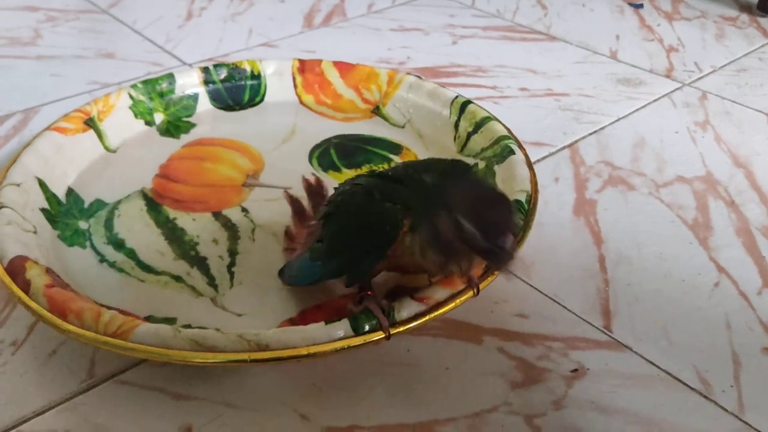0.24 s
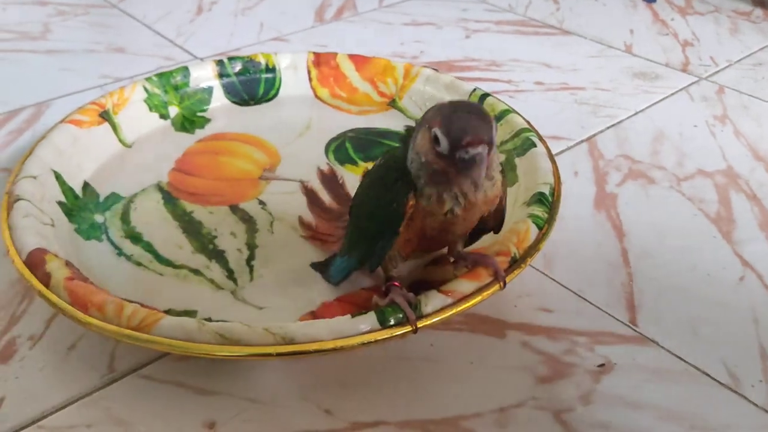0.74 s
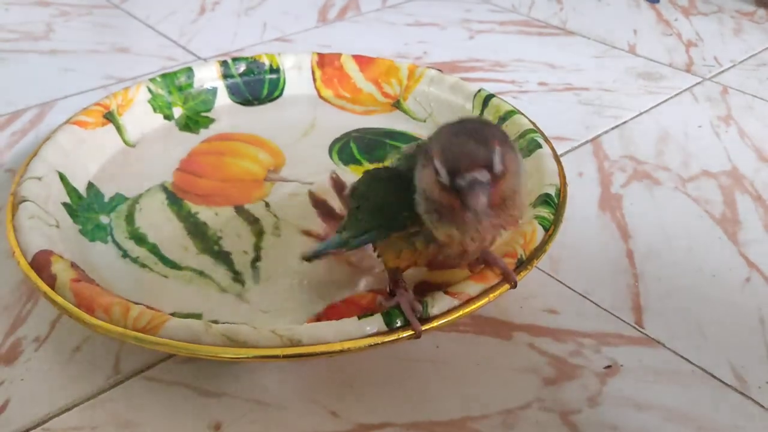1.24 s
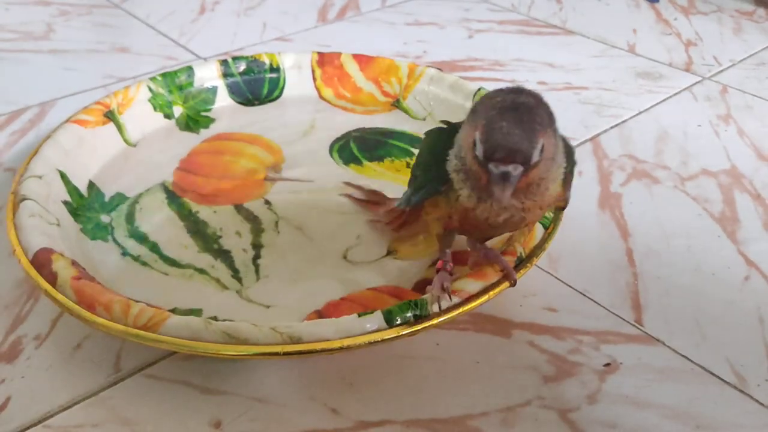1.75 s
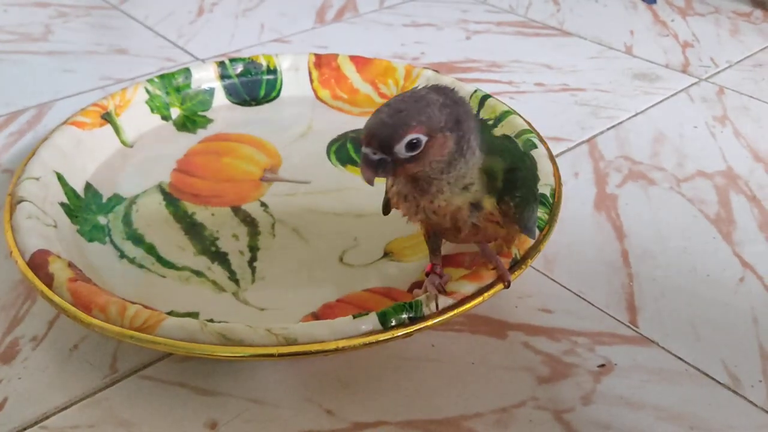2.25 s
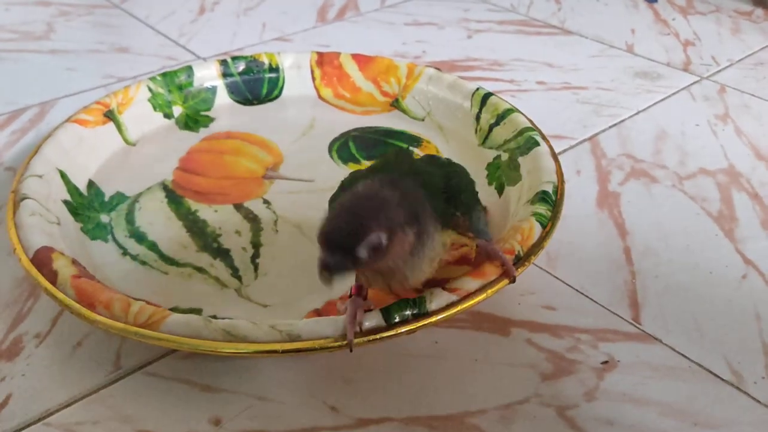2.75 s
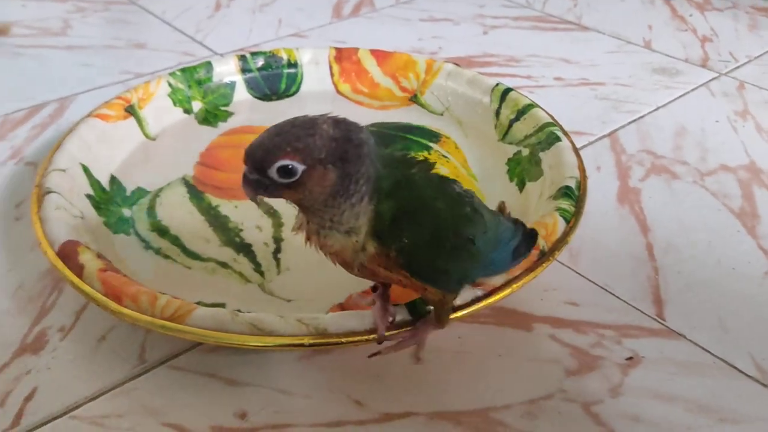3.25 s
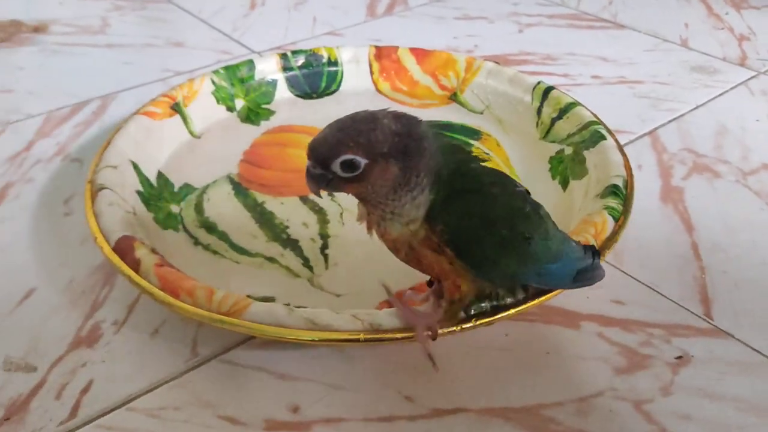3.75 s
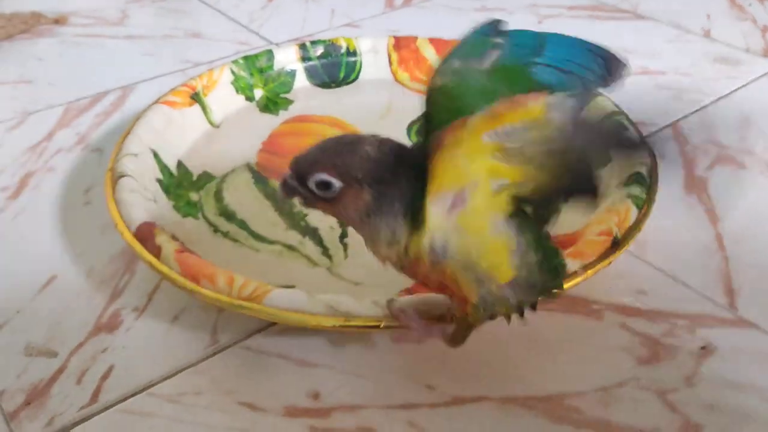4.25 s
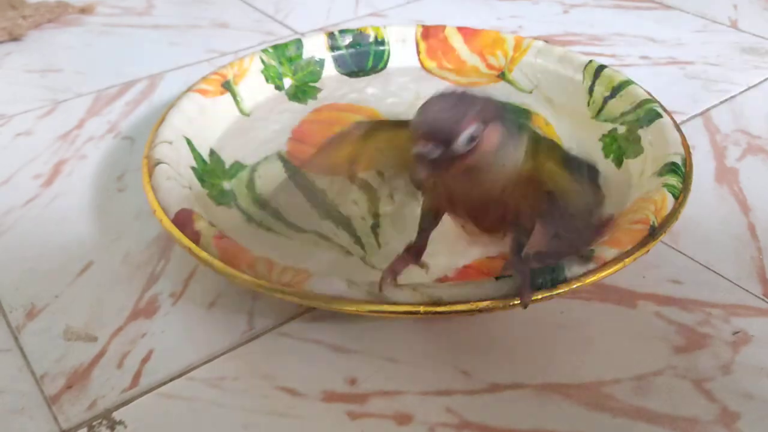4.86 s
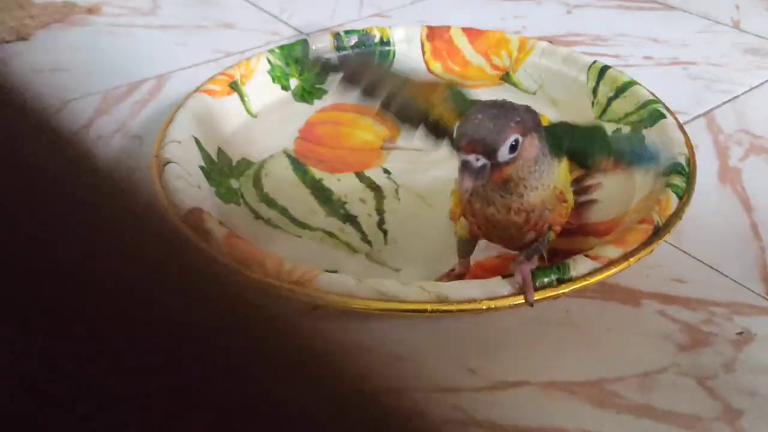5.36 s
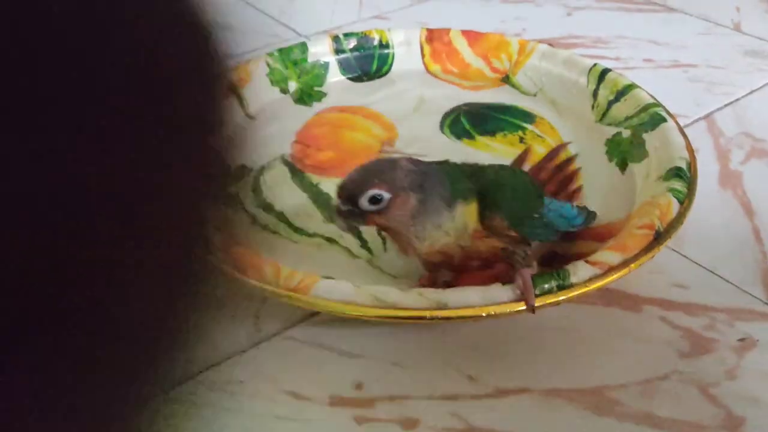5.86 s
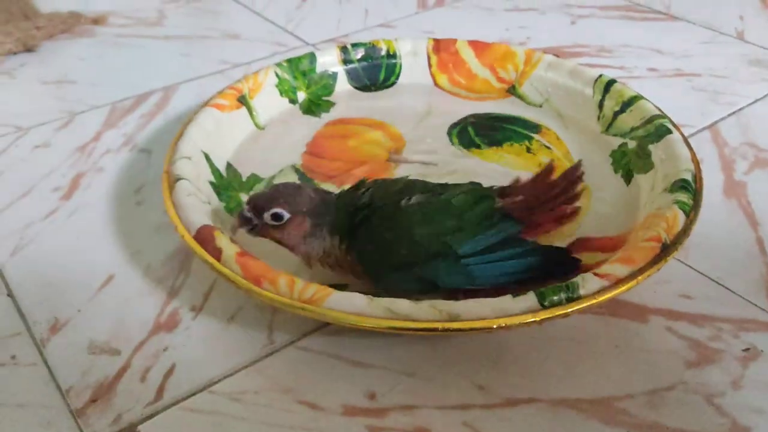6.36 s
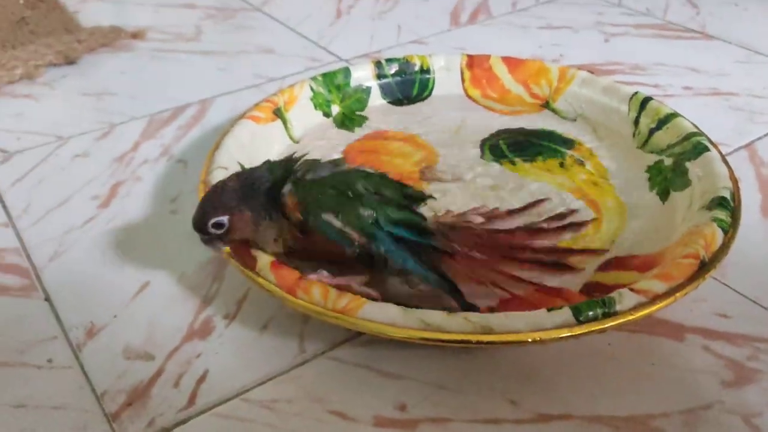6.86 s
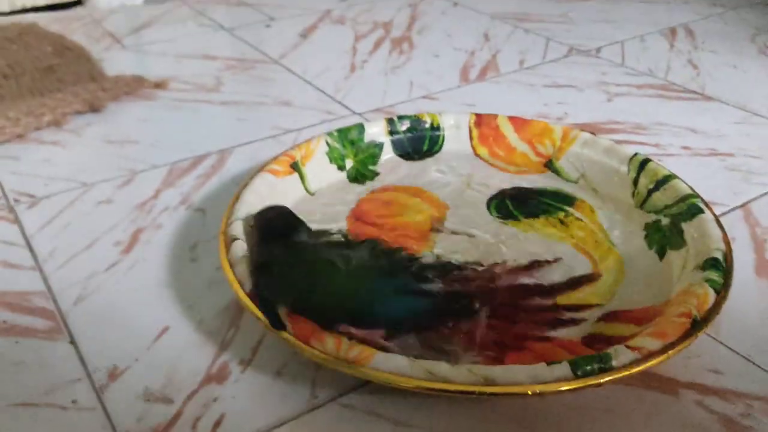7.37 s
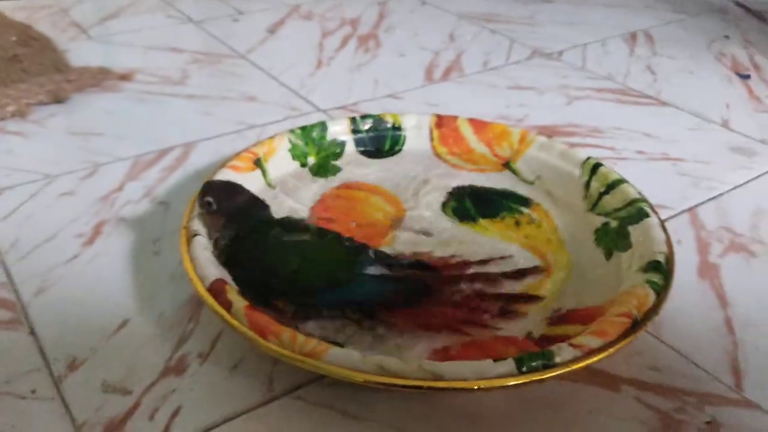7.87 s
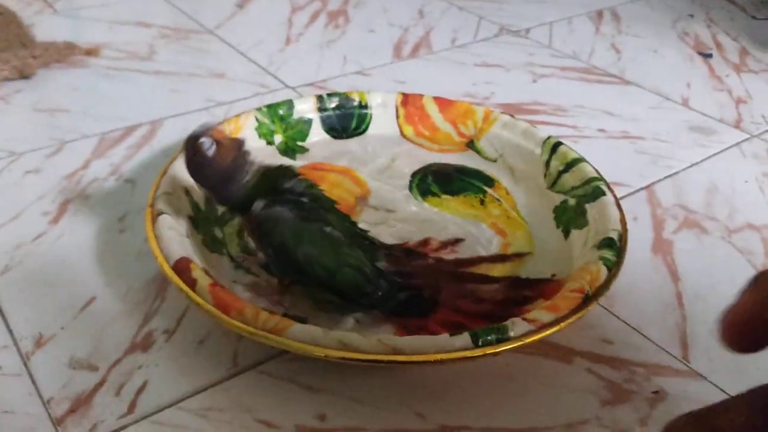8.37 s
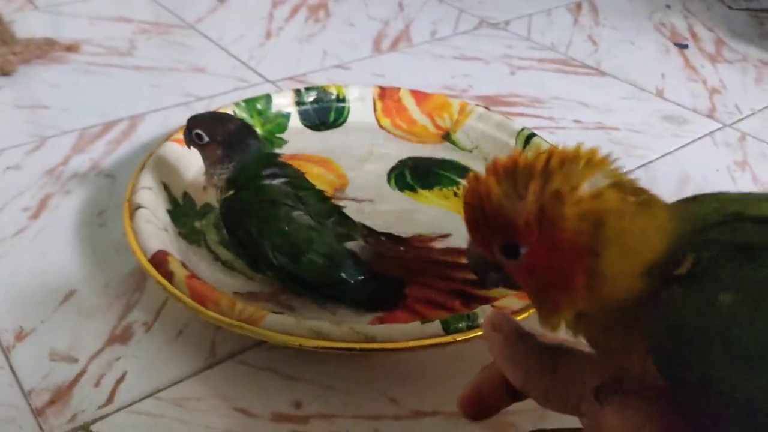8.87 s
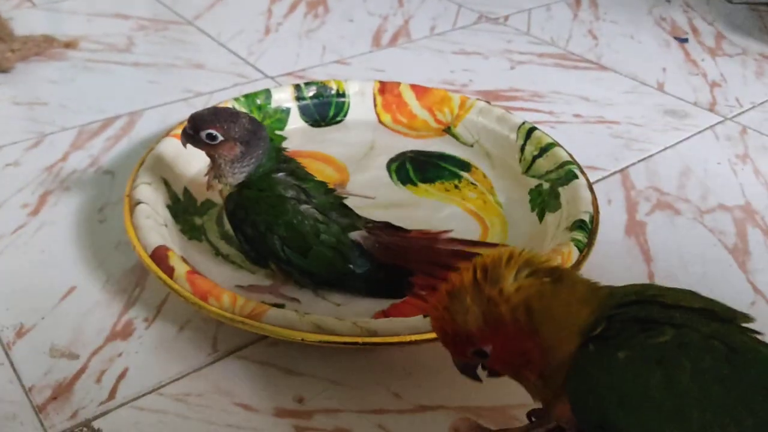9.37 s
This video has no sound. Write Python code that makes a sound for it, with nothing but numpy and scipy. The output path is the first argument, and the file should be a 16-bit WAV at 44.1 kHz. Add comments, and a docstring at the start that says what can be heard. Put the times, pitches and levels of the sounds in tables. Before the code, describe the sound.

A quick pair of buzzing parrot squawks opens over quiet room noise and a wavering fan hum. Sparse claws tick on a dish and low muttering follows. A second of hurried, uneven wing strokes swishes and thumps close by, capped by one harsh call. Later the bird bathes: feathers rustle, a knock, small water laps and bright bubbling plops, then thin chirps. Short echoes come off the tiles.

```python
"""Parrot bathing in a shallow dish

A small parrot wades in a dish on the tiled floor of a hard, humming room, close to the microphone.
Pulsed whistles rasp and gliding ones chirp; one burst of wing strokes is shaped noise with puffs of air.
Claws tick as dying cracks of noise, knocks add low ringing modes, wet feathers rustle in grainy noise.
Water is a lapping wash with ringing bubbles; behind it all lie a wavering fan hum and room noise.
Echoes off tiles and walls follow the calls, ticks, bubbles and knocks."""
import sys
import numpy as np
from scipy import signal
from scipy.fft import rfft, irfft, next_fast_len
from scipy.io import wavfile

SR = 44100
rng = np.random.default_rng(int(sys.argv[2]) if len(sys.argv) > 2 else 0)


def put_to_file(sound):
    """Save the sound as 16-bit audio at rate SR, in the file named by the first command-line argument."""
    columns = np.atleast_2d(sound).T  # one column per channel
    safe = np.clip(columns, -1, 1)
    whole_steps = np.round(safe * 32767)
    wavfile.write(sys.argv[1], SR, whole_steps.astype(np.int16))


N = 424683

# Every left-right level is left minus right, so positive values lie to the left.

# Rasping calls, close by: (time [s], length [s], first pulse rate [1/s], middle pitch [Hz], level [dB],
# loudest point [0-1], end against crest [dB], hiss against tone [ratio], left-right [dB])
SQUAWKS = [(.3925, .087, 112, 2600, -23.3, .68, -3, 1, 0),
           (.5262, .08, 127, 2280, -19.8, .27, -13, .85, .5),
           (5.2972, .074, 129, 2230, -21, .32, -9, .55, .5), (.301, .044, 97, 2900, -39, .5, -5, 1.4, 0),
           (5.162, .042, 128, 2150, -32, .5, -5, .6, .5), (7.609, .03, 136, 2293, -36, .1, -8, .4, -2.5),
           (8.127, .08, 78, 2210, -40, .1, -8, .7, -6)]
# Colour of the rasps: (frequency [Hz], level [dB])
RASP_SPECTRUM = [(800, -24), (1400, -7), (2200, 1), (3000, -3), (3700, -1), (4450, 2.5), (5050, -4.5),
                 (5800, 3.5), (6800, 8), (8000, 11.5), (9100, 4), (10100, -13), (11000, -36), (15000, -40)]
FULL_VOICE_DB, BRIGHTNESS_PER_DB = -15, 0.7  # below full voice the overtones sink by this many dB per dB
PULSE_S, BUZZ_DB = 0.0011, -11.5  # half width of a pulse to 1/e; tone between pulses
PULSE_SLOWING = .016  # share by which the mean pulse spacing grows with each pulse
ALTERNATION = .22  # pitch swing between long and short cycles, per unit of hiss


def squawks(start_pitch=.74, end_pitch=0.78, start_db=-10, uneven_db=1.0, jitter=0.1256):
    """The syrinx snaps open in slowing pulses; pitch and level arch with pressure, soft rasps are duller."""
    out = np.zeros((2, N))
    for s, length, rate, hz, db, crest, end_db, hiss, pan_db in SQUAWKS:
        overtones_db = BRIGHTNESS_PER_DB * min(db - FULL_VOICE_DB, 0)
        t = np.arange(-SR // 400, int(length * SR)) / SR
        u = t / length
        k = np.arange(20)
        when = k / rate * (1 + PULSE_SLOWING * k)
        strength = from_db(uneven_db * rng.standard_normal(20))
        openings = np.exp(-np.square((t - when[:, None]) / PULSE_S))
        pulses = rms_one(from_db(BUZZ_DB) + strength @ openings)
        swell = from_db(np.interp(u, [0, np.clip(crest, .05, .95), 1], [start_db, 0, end_db]))
        pitch = hz * np.interp(u, np.linspace(0, 1, 4), [start_pitch, 1, 1, end_pitch])
        # long and short cycles alternate, which puts bands between the harmonics
        pitch = pitch * (1 + ALTERNATION * hiss * np.sin(np.pi * np.cumsum(pitch) / SR))
        voice = syrinx(pitch, jitter * hiss, overtones_db, hiss)
        add(out, s + t[0], from_db(db) * sides(pan_db) * voice * pulses * swell)
    return colour(out, RASP_SPECTRUM)


# First four harmonics of the syrinx: level [dB]
OVERTONES = [-2.5, -2.5, -7, -47]


def syrinx(pitch_hz, jitter, overtones_db, hiss):
    """A harmonic whistle whose pitch shakes quickly, with some air noise."""
    size = len(pitch_hz)
    phase = 2 * np.pi * np.cumsum(pitch_hz * (1 + jitter * drift(1800, size))) / SR
    tone = np.zeros(size)
    for k, db in enumerate(OVERTONES):
        tone += from_db(db + overtones_db * (k > 0)) * np.sin((k + 1) * phase)
    return tone + hiss * from_db(overtones_db / 2) * rng.standard_normal(size)


# Chirrups, a falling whistle that breaks hoarsely and clears into a rising note:
# (time [s], fall [s], break [s], note [s], top [Hz], bottom [Hz], note [Hz], fall [dB], break [dB],
# note [dB], overtones [dB], hoarseness of the fall [0-1], left-right [dB])
CHIRRUPS = [(3.833, 0.037, 0.031, 0.027, 4210, 2315, 2702, -33.5, -38, -34, -3.5, 0.15, 6),
            (4.091, 0.036, 0.029, 0.032, 3970, 2324, 2562, -29.5, -32.5, -28.5, -3.5, .16, 6.5),
            (9.042, 0.027, 0.023, .02, 3740, 3350, 2336, -34.5, -36, -30, -20, 0.44, -4.5),
            (9.123, .031, .053, 0.0272, 4050, 3400, 2830, -24, -33, -27.5, -12.5, 0.06, -2.5),
            (9.319, 0.027, 0.039, 0.026, 3754, 3380, 2463, -32, -39.5, -41.5, -5, 0.06, -4)]
FALL_BEND = .33  # share of the fall done at half time
TAIL_OVERTONES_DB = -4  # break and note against the overtones of the fall
# Nasal whines that hook upwards: (time [s], length [s], pitch [Hz], level [dB], final hoarseness [0-1],
# splitting into strands [0-1], overtones [dB], left-right [dB])
WHINES = [(0.315, 0.012, 2824, -40, .55, .3, 3, 0.5), (2.104, .15, 2930, -43.5, 0.38, .18, 3, 2),
          (2.722, .04, 2750, -38, .9, .5, -7, 4), (3.0, .03, 2550, -46, .8, .5, -5, 4),
          (3.068, .02, 2850, -48, .5, .3, -8, 4), (6.866, 0.135, 3020, -45, 0.8, .5, 3.5, 0),
          (7.02, .14, 2850, -51, 0.7, .45, 3.5, 0), (8.391, 0.028, 2215, -42.5, 0.42, .1, 6, -3),
          (8.448, .028, 3083, -36, 0.1, .3, 1, -3.5), (8.516, .028, 2930, -36, 0.1, .3, 2, -3.5)]
# Soft, low mutters: (time [s], length [s], start [Hz], end [Hz], level [dB], left-right [dB])
MUTTERS = [(2.74, 0.051, 2300, 1910, -51, 2), (2.753, 0.081, 1008, 1000, -36.5, 8),
           (2.894, 0.21, 1020, 1125, -46.5, 7), (3.177, .21, 1820, 1600, -52, 8),
           (3.492, 0.079, 1442, 1500, -41, 3), (9.226, 0.045, 1817, 1694, -41, -3),
           (9.498, 0.05, 1211, 1144, -36.5, -5), (9.528, 0.12, 579, 618, -31, 3)]
MUTTER_OVERTONES_DB = -14
# Colour of these calls, farther off: (frequency [Hz], level [dB])
VOICE_SPECTRUM = [(700, -18.5), (1300, -6), (2100, 3), (3200, -1), (4700, -8.5), (5900, -1.5), (6600, 2),
                  (7800, 8), (9200, -3.5), (10200, -15), (15000, -87)]


def chirps():
    """Three kinds of whistled call, each with its own pitch shape: chirrups, whines and mutters."""
    out = np.zeros((2, N))
    for (s, fall_s, break_s, note_s, top_hz, bottom_hz, note_hz,
         fall_db, break_db, note_db, overtones_db, hoarse, pan_db) in CHIRRUPS:
        halfway_hz = top_hz - FALL_BEND * (top_hz - bottom_hz)
        tail_db = overtones_db + TAIL_OVERTONES_DB
        fall = chirp(fall_s, (top_hz, halfway_hz, bottom_hz), overtones_db, (hoarse, hoarse),
                     onset_db=-9 * hoarse)
        crack = chirp(break_s, note_hz * np.array((.84, .95)), tail_db, hoarseness=(.95, .75))
        note = chirp(note_s, note_hz * np.array((.95, 1.04)), tail_db, hoarseness=(.4, .24))
        call = np.r_[from_db(fall_db) * fall, from_db(break_db) * crack, from_db(note_db) * note]
        add(out, s, sides(pan_db) * call)
    for s, length, hz, db, hoarse, split, overtones_db, pan_db in WHINES:
        pitches_hz = hz * np.array((.82, 0.98, 1.01, .98))
        whine = chirp(length, pitches_hz, overtones_db, (max(0.5, hoarse), hoarse),
                      onset_db=-0.5, split=split)
        add(out, s, from_db(db) * sides(pan_db) * whine)
    for s, length, start_hz, end_hz, db, pan_db in MUTTERS:
        mutter = chirp(length, (start_hz, end_hz), MUTTER_OVERTONES_DB, hoarseness=(.6, .42))
        add(out, s, from_db(db) * sides(pan_db) * mutter)
    return colour(out, VOICE_SPECTRUM)


STRAND_HZ, STRAND_SPREAD, WARBLE = 640, .42, .045  # splitting vibration; shares of pitch when fully hoarse


def chirp(length, pitches_hz, overtones_db, hoarseness, onset_db=0, split=1, hoarse_jitter=0.087,
          flutter_db=3):
    """A gliding whistle; when hoarse it warbles, and a slower vibration splits it into strands."""
    u = np.linspace(0, 1, int(length * SR))
    hoarse = np.interp(u, [0, .75], hoarseness)
    # a smooth curve through all the pitches, evenly spaced in time
    count = len(pitches_hz)
    glide = np.polyfit(np.linspace(0, 1, count), pitches_hz, count - 1)
    pitch = np.polyval(glide, u)
    beat = split * hoarse * np.sin(2 * np.pi * STRAND_HZ * length * u + drift(150, len(u)))
    pitch = pitch * (1 + WARBLE * hoarse * drift(170, len(u)) + STRAND_SPREAD * beat)
    tone = syrinx(pitch, hoarse * hoarse_jitter, overtones_db, hiss=0.91 * hoarse ** 2)
    swell_db = flutter_db * hoarse * drift(226, len(u)) + np.interp(u, [0, .5], [onset_db, 0])
    return tone * signal.windows.tukey(len(u), .25) * from_db(swell_db)


# Wing strokes: (time of crest [s], swish length [s], swish [dB], flutter [dB], air puff [dB])
WINGS = [(3.936, 0.095, -47, -54, -35.5), (4.022, 0.02, -57, -65, -35), (4.108, 0.013, -36, -44.5, -50),
         (4.153, 0.017, -61, -41, -48), (4.202, 0.029, -35, -57, -57), (4.297, 0.031, -38, -33, -25),
         (4.37, 0.0093, -46, -46.5, -62), (4.46, 0.0053, -35, -58, -70), (4.628, 0.044, -42, -47.5, -67),
         (4.71, 0.03, -43.5, -40, -61), (4.794, 0.064, -43.5, -40.5, -58), (4.877, 0.03, -51, -42, -51),
         (4.955, 0.01, -40.5, -41.5, -49)]
# Air on the microphone: (time [s], level [dB])
DRAUGHT = [(3.05, -64), (3.24, -49), (4.08, -40.5), (4.17, -29), (4.5, -49), (4.62, -45.5), (5.7, -48),
           (5.9, -63)]
# Colours of the swish, of wing feathers flapping, and of air on the microphone: (frequency [Hz], level [dB])
SWISH_SPECTRUM = [(100, -3), (700, -1), (1100, -2.5), (1600, -3.5), (3000, -1), (5000, -12), (7700, 1),
                  (9000, 2.5), (10000, -21), (15500, -15)]
FLUTTER_SPECTRUM = [(60, -19), (150, 9), (300, -0.5), (500, -6.5), (950, -7.5), (1500, -26), (5000, -33)]
AIR_SPECTRUM = [(10, 1.5), (35, -1.5), (70, -2.5), (100, -22.5), (200, -11.5), (400, -30.5), (2000, -55),
                (8000, -88)]
FLUTTER_HZ, FLUTTER_S = 70, 0.018  # mean flapping rate; half width of a flutter to 1/e


def wings(attack_share=0.43, swish_pan_db=2, flutter_pan_db=6, puff_pan_db=13, draught_pan_db=8):
    """Each stroke swishes through the feathers, makes them flap and puffs air mostly over the left port."""
    swish, flutter, puff = np.zeros((3, 2, N))
    t = np.arange(-SR // 10, SR // 10) / SR
    for s, length, swish_db, flutter_db, puff_db in WINGS:
        width = np.where(t < 0, attack_share * length, length)
        add(swish, s + t[0], from_db(swish_db) / (1 + (t / width) ** 4))
        add(flutter, s + t[0], from_db(flutter_db) * np.exp(-np.square(t / FLUTTER_S)))
        add(puff, s + t[0], from_db(puff_db) / (1 + (t / 0.019) ** 4))
    flap_phase = 2 * np.pi * FLUTTER_HZ * np.arange(N) / SR + 2 * drift(30, N)
    flaps = rms_one(1 + .7 * np.sin(flap_phase))
    grain = from_db(2 * drift(500, N)) * rng.standard_normal((2, N))
    feathers = colour(swish * flaps * grain, SWISH_SPECTRUM)
    body = colour(flutter * flaps * diffuse(), FLUTTER_SPECTRUM)
    push = puff * sides(puff_pan_db) + level(DRAUGHT) * sides(draught_pan_db)
    air = push * colour(diffuse(), AIR_SPECTRUM)
    return feathers * sides(swish_pan_db) + body * sides(flutter_pan_db) + air


# Claws and beak on the dish, and drops: (time [s], level [dB], left-right [dB])
TICKS = [(1.071, -42, -2), (1.1034, -33, -1), (1.6227, -35.5, 1), (1.7404, -31.5, 7), (2.0283, -38.5, 9),
         (2.382, -39.5, 2), (2.6808, -28, 1), (4.2052, -28, -6), (4.372, -28, 9), (4.618, -22, 2),
         (4.7845, -29, -10), (4.9475, -19.5, -2), (5.2845, -25, -3), (6.569, -28, -1), (6.842, -31, -8),
         (7.502, -39, -1), (7.644, -31, -4), (7.8404, -23, -2), (7.8254, -23, -12), (7.8655, -33, -2),
         (7.8806, -23.5, -8), (8.0394, -31, -17), (8.128, -45, -2)]


def ticks():
    """Claws, beak and drops strike the dish with very short, bright cracks."""
    return contacts(TICKS, FEATHER_SPECTRUM, decay_s=0.001)


# Dull knocks beside the microphone: (time [s], crack level [dB], ring level [dB], left-right [dB])
KNOCKS = [(4.196, -29, -26, 17), (4.206, -22, -24.5, 1.5), (4.295, -18, -20, 13), (4.309, -27, -28, -2),
          (4.45, -27, -66, 0), (7.211, -41, -30, 19), (7.2444, -24.5, -40, -23), (7.246, -18.5, -17, 32),
          (7.2584, -48, -31, 22)]
# Colour of the cracks: (frequency [Hz], level [dB])
KNOCK_SPECTRUM = [(30, -20), (100, 7.5), (220, -10), (600, 5), (1000, -4.5), (2200, -4), (5000, -17),
                  (7700, 4), (10000, -23), (15500, -48)]


def knocks():
    """Each dull knock is a crack of noise with a low ring."""
    cracks = [(s, db, pan_db) for s, db, _, pan_db in KNOCKS]
    return contacts(cracks, KNOCK_SPECTRUM, decay_s=0.0033) + thuds()


# Low modes that ring in a knock: (frequency [Hz], level [dB], time to fall 60 dB [s])
KNOCK_BODY = [(159, -10, 0.08), (300, -2, 0.022), (540, -8, .022)]


def thuds():
    """Every knock also rings briefly with the same low modes."""
    out = np.zeros((2, N))
    t = np.arange(SR // 5) / SR
    body = sum(from_db(db - 60 * t / t60) * np.cos(2 * np.pi * hz * t) for hz, db, t60 in KNOCK_BODY)
    for s, _, ring_db, pan_db in KNOCKS:
        add(out, s, from_db(ring_db) * sides(pan_db) * body)
    return out


def contacts(rows, spectrum, decay_s):
    """Each contact is a short crack of noise that dies away exponentially."""
    out = np.zeros((2, N))
    t = np.arange(SR // 20) / SR
    for s, db, pan_db in rows:
        crack = np.exp(-t / decay_s) * rng.standard_normal((2, len(t)))
        add(out, s, from_db(db) * sides(pan_db) * crack)
    return colour(out, spectrum)


# How briskly the bird moves, from perching through flapping to bathing: (time [s], level [dB])
BUSTLE = [(0, -61), (.9, -62), (2.62, -66), (2.72, -57.5), (3.4, -54.5), (3.9, -49.5), (4.45, -51.5),
          (4.95, -45.5), (5.55, -52.5), (6.12, -56.5), (6.62, -49), (7.52, -57), (7.85, -50.5),
          (8.28, -60.5), (8.8, -63.5), (9.08, -50.5), (9.4, -81)]
# Brief shakes of wet feathers: (time [s], length [s], level [dB], left-right [dB])
SHAKES = [(0.108, 0.065, -61, 8), (1.311, 0.077, -52.5, 4), (2.878, 0.037, -53, 1), (5.734, 0.083, -49, -3),
          (5.931, 0.058, -38, -20), (6.596, 0.092, -42, -5), (6.679, 0.097, -46.5, -36),
          (8.834, 0.068, -47, -5), (9.511, 0.09, -47.5, -2)]
# Colour of the feathers, shared by the ticks: (frequency [Hz], level [dB])
FEATHER_SPECTRUM = [(300, -18), (1500, -11), (3000, -14), (5000, -8.5), (6500, -2), (7700, 4.5),
                    (9000, -0.5), (10000, -20), (15500, -25)]


def rustle(grain_db=1.0, flicker_db=3.0):
    """Wet feathers slide over each other in fine grains as the bird moves, harder in each shake."""
    effort = level(BUSTLE) * from_db(flicker_db * drift(35, N)) * np.ones((2, 1))
    for s, length, db, pan_db in SHAKES:
        add(effort, s, from_db(db) * sides(pan_db) * signal.windows.tukey(int(length * SR), .3))
    grains = from_db(grain_db * drift(900, N)) * rng.standard_normal((2, N))
    return colour(effort * grains, FEATHER_SPECTRUM)


# The body dips and the water sloshes:
# (time of crest [s], wash level [dB], bubble level [dB], bubbling lasts [s])
SLOSHES = [(7.23, -45.5, -44, .16), (7.82, -55.5, -39, .45), (8.14, -72, -46, .4)]
# Single bubbles that stand out: (time [s], starting pitch [Hz], level [dB])
PLOPS = [(7.252, 1520, -33), (7.263, 2000, -37), (7.61, 2300, -30.5), (7.647, 2870, -32.5),
         (7.757, 3680, -38.5), (7.841, 2440, -35), (7.864, 2330, -32), (7.88, 1850, -28),
         (7.904, 2050, -27), (7.961, 1610, -34), (8.126, 1920, -28), (8.137, 3300, -40),
         (8.19, 2390, -36.5), (8.02, 2100, -37), (8.327, 2080, -44)]
SLOSH_RISE_DB_PER_S, WASH_FALL_DB_PER_S, BUBBLE_FALL_DB_PER_S = 133.5, 131, 19


def bubbles(per_s=340, spread_db=20, lead_s=.1, lowest_hz=1100, pitch_span=4.1, plop_pan_db=-3):
    """Each slosh frees a dying swarm of small bubbles; others plop on their own."""
    out = np.zeros((2, N))
    for s, _, db, lasting_s in SLOSHES:
        for when, size, weakness, place in rng.random((int(per_s * lasting_s), 4)):
            delay = when * lasting_s - lead_s
            strength = from_db(db + slosh_db(delay, BUBBLE_FALL_DB_PER_S) - spread_db * weakness)
            bubble = ping(lowest_hz * pitch_span ** size)
            add(out, s + delay, strength * sides(8 * (place - .5)) * bubble)
    for s, hz, db in PLOPS:
        add(out, s, from_db(db) * sides(plop_pan_db) * ping(hz))
    return out


BUBBLE_CYCLES = 8.3  # cycles of the starting pitch to die to 1/e
BUBBLE_RISE = 0.095  # phase gained by the end, as a share; the pitch itself rises by twice this share


def ping(hz):
    """A bubble rings for a few cycles and rises in pitch as it reaches the surface."""
    t = np.arange(SR // 40) / SR
    ring = np.cos(2 * np.pi * hz * t * (1 + BUBBLE_RISE * t / t[-1]))
    return ring * np.exp(-t * hz / BUBBLE_CYCLES)


def slosh_db(t, fall_db_per_s):
    """A slosh swells to its crest at t = 0 and settles at the given rate."""
    return np.minimum(SLOSH_RISE_DB_PER_S * t, -fall_db_per_s * t)


# Colour of the wash: (frequency [Hz], level [dB])
WATER_SPECTRUM = [(100, 1), (250, -18.5), (600, 4.5), (1200, -1), (2200, 0.5), (4500, -11), (10000, -44)]
SCUFF_S, SCUFF_LENGTH_S, SCUFF_DB = 9.51, 0.134, -46  # a soft, dull scuff close by


def water(lap_db=2, under_rustle_db=-4, pan_db=3):
    """A lapping wash of water and air follows the movement and swells in sloshes; the scuff shares it."""
    t = np.arange(N) / SR
    stir = from_db(under_rustle_db) * level(BUSTLE)
    for s, db, _, _ in SLOSHES:
        stir = stir + from_db(db + slosh_db(t - s, WASH_FALL_DB_PER_S))
    stir = stir * sides(pan_db)
    add(stir, SCUFF_S, from_db(SCUFF_DB) * signal.windows.tukey(int(SCUFF_LENGTH_S * SR), .5))
    return stir * from_db(lap_db * drift(40, N)) * colour(diffuse(), WATER_SPECTRUM)


# Fan hum: (frequency [Hz], level [dB])
HUM = [(58, -98), (117, -65), (187.5, -55.5), (372, -71.5), (563, -70), (620, -72.5)]
# Colour of the steady room noise: (frequency [Hz], level [dB])
ROOM_TONE_SPECTRUM = [(15, -20), (25, -26), (64, -13.5), (86, -24), (103, -20), (154, -5), (186, -8),
                      (219, -8), (573, -22), (1240, -23), (1960, -23), (3540, -36), (3930, -37),
                      (7280, -39), (15000, -61)]
ROOM_TONE_DB = -54.5


def fan(pan_db=4):
    """A hum of partials wavering in level and phase, in the steady noise of the room."""
    t = np.arange(N) / SR
    hum = np.zeros(N)
    for hz, db in HUM:
        waver = 1 + .2 * drift(9, N)
        hum += from_db(db) * np.sqrt(2) * waver * np.sin(2 * np.pi * hz * t + .7 * drift(9, N))
    room_noise = from_db(ROOM_TONE_DB) * colour(diffuse(), ROOM_TONE_SPECTRUM)
    return (hum + room_noise) * sides(pan_db)


ROOM_T60_S = 0.31  # the tail falls 60 dB in this time


def room(x, wet_db, early_db, early_s):
    """Direct sound, a little later on the left; early echoes off tiles and walls; then the room's tail."""
    t = np.arange(SR) / SR
    early = rng.standard_normal((2, SR)) * np.exp(-t / early_s) * (t > .002)
    tail = rng.standard_normal((2, SR)) * from_db(-60 * t / ROOM_T60_S) * (1 - np.exp(-t / 0.011))
    paths = (from_db(early_db) * rms_one(early) + from_db(wet_db) * rms_one(tail)) / np.sqrt(SR)
    paths[[0, 1], [13, 0]] += 1  # direct path: left 13 samples after right
    paths = paths / np.sqrt(np.sum(paths ** 2) / 2)
    return signal.fftconvolve(x, paths, axes=1)[:, :N]


# How alike the two channels of surrounding noise are: (frequency [Hz], left-right coherence [0-1])
LIKENESS = [(30, 0.68), (150, 0.88), (600, 0.54), (1400, 0), (2500, 0.03), (15000, 0)]


def diffuse():
    """White stereo noise, alike on both sides only in the lower range."""
    size = 2 * next_fast_len(N // 2 + 1)
    alike = np.clip(at_bins(LIKENESS, size), -1, 1)
    mid, side = rfft(rng.standard_normal((2, size)))
    shared = np.sqrt((1 + alike) / 2) * mid
    opposed = np.sqrt((1 - alike) / 2) * side * [[1], [-1]]
    return irfft(shared + opposed)[:, :N]


def colour(x, spectrum, size=16384):
    """Causal (minimum-phase) filter that keeps the power of white noise."""
    cepstrum = irfft(np.log(rms_one(from_db(at_bins(spectrum, size)))))
    # folding the cepstrum onto positive time makes the filter causal
    cepstrum[1:size // 2] *= 2
    cepstrum[size // 2 + 1:] = 0
    response = irfft(np.exp(rfft(cepstrum)))[:size // 2]
    return signal.oaconvolve(x, response[None], axes=1)[:, :N]


def at_bins(points, size):
    """A table over log frequency, read at every Fourier bin."""
    hz, value = np.transpose(points)
    return np.interp(np.log(np.fft.rfftfreq(size, 1 / SR) + 1), np.log(hz), value)


def drift(rate_hz, size):
    """Random wander about zero: straight lines between normal draws at the given rate."""
    knots = rng.standard_normal(SR)
    return np.interp(np.arange(size) * rate_hz / SR, np.arange(SR), knots)


def level(curve):
    """Gain in time from (time [s], level [dB]) rows."""
    return from_db(np.interp(np.arange(N) / SR, *np.transpose(curve)))


def add(out, s, sound):
    """Mixes a sound in from time s."""
    start = max(int(s * SR), 0)
    out[:, start:start + sound.shape[-1]] += sound[..., :N - start]


def sides(pan_db):
    """Left and right gains of constant power."""
    return rms_one(from_db(np.array([[pan_db], [-pan_db]]) / 2))


def rms_one(x):
    """Scales to a root-mean-square of one."""
    return x / np.sqrt(np.mean(x ** 2) + 1e-20)


def from_db(db):
    """Amplitude ratio of a level in dB."""
    return 10 ** (np.asarray(db) / 20)


NEAR_ECHO_DB, NEAR_ECHO_S = -4.5, .009  # early echoes of close sounds: level; decay to 1/e


def scene():
    """Near and farther calls, contacts and movement over the room tone."""
    near = room(squawks(), wet_db=-7.0, early_db=NEAR_ECHO_DB, early_s=NEAR_ECHO_S)
    farther = room(chirps(), wet_db=-1.5, early_db=-3.5, early_s=0.0096)
    dish = room(ticks() + bubbles(), wet_db=-4.0, early_db=NEAR_ECHO_DB, early_s=NEAR_ECHO_S)
    beside_microphone = room(knocks(), wet_db=-10.5, early_db=-11, early_s=NEAR_ECHO_S)
    return near + farther + wings() + dish + beside_microphone + rustle() + water() + fan()


# The two microphone ports resonate at different pitches: (frequency [Hz], left-right [dB])
PORTS = [(1200, 1.5), (1900, -0.5), (2900, 3.5), (4100, -3.5), (5200, 2.5), (6200, -2.5), (7300, -6),
         (8000, -1.5), (8800, 10.5), (9600, -1), (10800, -2), (15000, 2.5)]
CUTOFF_HZ = 15900


def record(dry):
    """Each microphone port colours its own channel; the top is cut steeply."""
    channels = []
    for k in range(2):
        spectrum = [(hz, 20 * np.log10(sides(db)[k, 0])) for hz, db in PORTS]
        channels.append(colour(dry[[k]], spectrum))
    steep_cut = signal.ellip(10, .3, 70, CUTOFF_HZ, fs=SR, output="sos")
    return signal.sosfilt(steep_cut, np.vstack(channels))


dry = scene()
out = record(dry)
put_to_file(out)
```